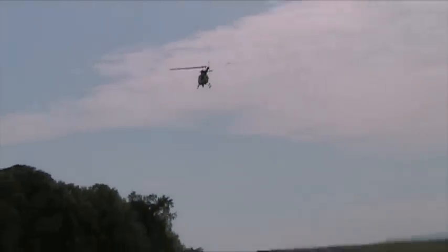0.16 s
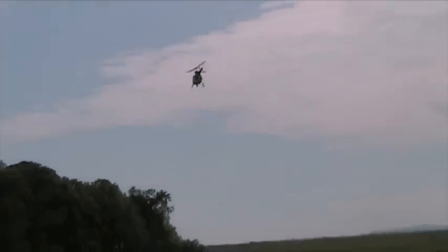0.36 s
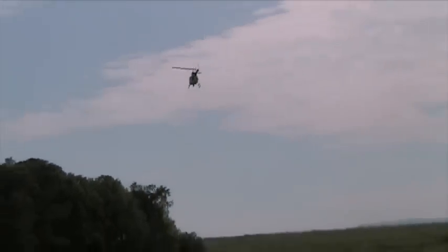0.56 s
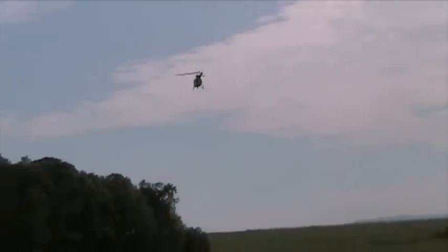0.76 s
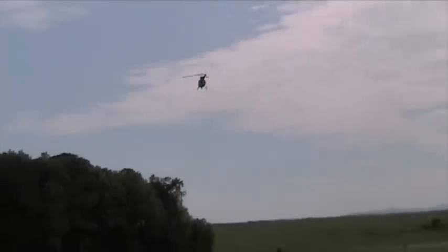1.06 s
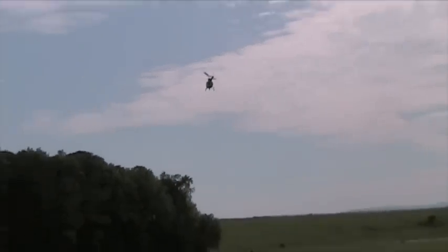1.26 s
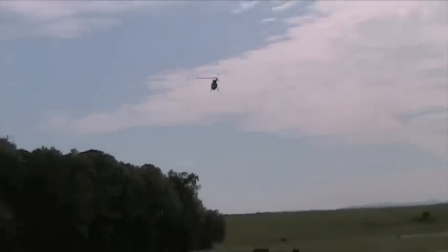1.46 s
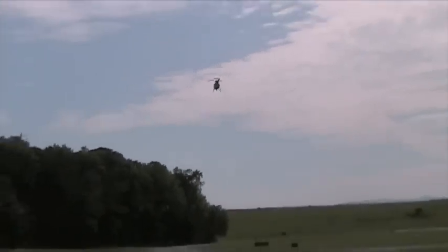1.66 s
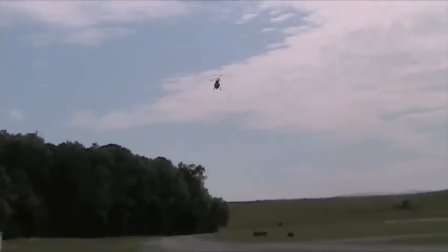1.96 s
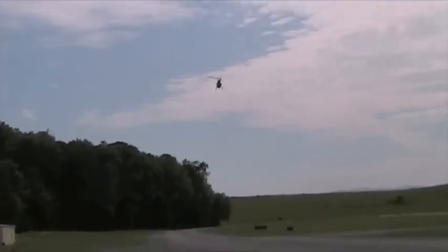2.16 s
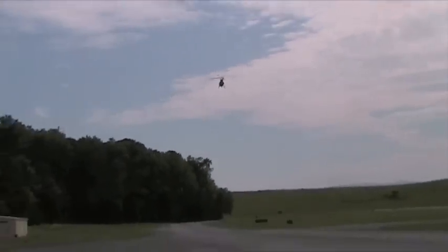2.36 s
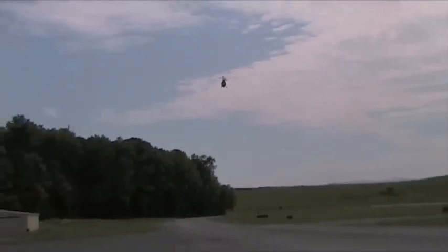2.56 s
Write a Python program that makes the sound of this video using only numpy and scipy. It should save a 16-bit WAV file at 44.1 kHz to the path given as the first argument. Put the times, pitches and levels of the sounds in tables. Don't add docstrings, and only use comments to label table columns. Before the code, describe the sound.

Helicopter receding outdoors: rapid throaty rotor throb dominates, with crackling blade slaps about twelve times a second, airy swishes and rough exhaust roar; the top softens with distance. Nearby handheld stereo microphone, slight hiss.

```python
import sys
import numpy as np
from scipy import signal
from scipy.fft import rfft, irfft, next_fast_len
from scipy.io import wavfile
from scipy.ndimage import uniform_filter1d, map_coordinates

SR = 44100
rng = np.random.default_rng(int(sys.argv[2]) if len(sys.argv) > 2 else 0)


def digitize_waveform(pressure):
    field = np.atleast_2d(pressure).T
    bounded = np.clip(field, -1, 1)
    quanta = np.round(bounded * 32767).astype(np.int16)
    wavfile.write(sys.argv[1], SR, quanta)


def linear_from_db(decibels):
    return 10 ** (np.asarray(decibels, float) / 20)


N = 120393

TAIL_HZ, TAIL_FIRST_S = 79.81, .0082
MAIN_HZ, WAKE_FIRST_S = 12.327, .062


def unit(x):
    return x / np.sqrt(np.mean(x ** 2) + 1e-20)


def along(points, hz):
    point_hz, value = np.transpose(points)
    return np.interp(np.log(hz + 1), np.log(point_hz + 1), value)


def colour(points):
    closed = [(points[0][0] / 2, -90), *points, (points[-1][0] * 2, -90)]
    return lambda hz: linear_from_db(along(closed, hz))


def wobble(rate_hz):
    knots = rng.standard_normal(int(N * rate_hz / SR) + 4)
    return map_coordinates(knots, [np.arange(N) * rate_hz / SR])


def filtered(x, response):
    m = next_fast_len(N + SR // 2)
    return irfft(rfft(x, m) * response(np.fft.rfftfreq(m, 1 / SR)), m)[..., :N]


def rush(spectrum, patchy_db):
    z = signal.stft(rng.standard_normal(N), nperseg=512)[2]
    patches = uniform_filter1d(rng.standard_normal(z.shape), size=5, axis=0)
    patches = unit(uniform_filter1d(patches, size=10, axis=1))
    noise = signal.istft(z * linear_from_db(patchy_db * patches), nperseg=512)[1][:N]
    return unit(filtered(noise, colour(spectrum)))


def spikes(s, size):
    at = np.clip(s * SR, 0, N - 1)
    i = at.astype(int)
    early = np.bincount(i, size * (1 - at + i), N + 1)
    late = np.bincount(i + 1, size * (at - i), N + 1)
    return (early + late)[:N]


def swell(s, rise_s, fall_s):
    return np.where(s < 0, np.exp(-(s / rise_s) ** 2), np.exp(-np.abs(s) / fall_s))


def ringing(x, peaks):
    def shape(f):
        total = sum(linear_from_db(db) * (1j * f * width / (hz * hz - f * f + 1j * f * width)) ** 2
                    for hz, width, db in peaks)
        return total / (1 + 1j * f / 1800) ** 2
    return filtered(x, shape) / np.abs(filtered(np.arange(N) == N // 2, shape)).max()


def from_wake(s):
    turn = np.round((s - WAKE_FIRST_S) * MAIN_HZ - .15)
    return s - WAKE_FIRST_S - turn / MAIN_HZ, turn.astype(int) + 1


def pass_db():
    # (time [s], extra level [dB])
    slaps = [(.22, 1.5), (.385, 2.5), (.71, 1.5), (1.2, 5.5), (1.44, 3), (1.6, 2.5), (1.77, 4.5),
             (1.86, 2.5), (1.93, 4), (2.09, 3.5), (2.25, 5), (2.42, 3.5), (2.58, 3.5)]
    scatter_db = 1.2
    s = WAKE_FIRST_S + (np.arange(int(N / SR * MAIN_HZ) + 3) - 1) / MAIN_HZ
    hard_db = sum(db * (np.abs(s - at) < .5 / MAIN_HZ) for at, db in slaps)
    return scatter_db * rng.standard_normal(len(s)) + hard_db


def tail_pulse(t, pass_s, jitter, strength):
    # (frequency [Hz], level [dB])
    pulse_spectrum = [(60, -27.5), (80, -13), (160, -2), (240, 1.5), (320, -2.5), (400, -2), (520, -12),
                      (800, -21.5)]
    # (frequency [Hz], level change [dB])
    flight_shift = [(80, -3), (160, -6), (240, 5.5), (320, 1), (400, 0), (480, -0.5), (640, -8.5)]
    lead_s, jitter_s, scatter_db, skew_rad, drift_db = .0004, .00008, .8, -.6, .8
    beats = spikes(pass_s - lead_s + jitter_s * jitter, -linear_from_db(scatter_db * strength))
    pulse = unit(filtered(beats, lambda hz: colour(pulse_spectrum)(hz) * np.exp(1j * skew_rad)))
    pulse = pulse * linear_from_db(drift_db * wobble(4.1))
    near = filtered(pulse, lambda hz: linear_from_db(-.5 * along(flight_shift, hz)))
    far = filtered(pulse, lambda hz: linear_from_db(.5 * along(flight_shift, hz)))
    share = (t / t[-1]) ** 2
    return (1 - share) * near + share * far


def wake_cracks(t, passes_db, pass_s, jitter, strength):
    # (time [s], peak level [dB])
    clear_cuts = [(0.041, -16), (0.056, -15), (0.116, -16), (0.13, -13), (0.203, -15), (0.219, -13),
                  (0.278, -19), (0.294, -13), (0.367, -15), (0.383, -12), (0.441, -18), (0.457, -12),
                  (0.531, -16), (0.545, -13), (0.604, -16), (0.62, -11), (0.689, -15), (0.708, -13),
                  (0.783, -16), (0.797, -16), (0.827, -18), (0.858, -17), (0.871, -16), (0.928, -19),
                  (0.946, -14), (1.021, -16), (1.035, -15), (1.109, -17), (1.179, -17), (1.198, -17),
                  (1.272, -16), (1.359, -19), (1.435, -16), (1.597, -18), (1.673, -18), (1.748, -18),
                  (1.761, -17), (1.836, -19), (1.925, -17), (1.975, -20), (1.998, -17), (2.087, -18),
                  (2.161, -19), (2.232, -19), (2.249, -14), (2.325, -19), (2.413, -17), (2.488, -17),
                  (2.577, -17), (2.651, -17)]
    # (frequency [Hz], width [Hz], level [dB])
    near_peaks = [(1230, 800, 0), (2600, 1200, -28)]
    # (frequency [Hz], width [Hz], level [dB])
    far_peaks = [(1100, 600, 0), (2800, 1200, -26)]
    peak_s, rise_s, fall_s = -.005, .012, .022
    lead_s, jitter_s, slide = .0013, .0002, .075
    scatter_db, fade_db_per_s, unlisted_db = 1.5, .3, -9
    stress, delay_s = 1.2, .0004

    gap_s, turn = from_wake(pass_s)
    size_db = scatter_db * strength + 0.11 * passes_db[turn] + fade_db_per_s * pass_s
    size = swell(gap_s - peak_s, rise_s, fall_s) * linear_from_db(size_db)
    faint = spikes(pass_s + jitter_s * jitter - lead_s + slide * gap_s, size)
    at, peak_db = np.transpose(clear_cuts)
    clear = spikes(at + delay_s, linear_from_db(stress * (peak_db - peak_db.max()) + fade_db_per_s * at))
    cuts = clear + linear_from_db(unlisted_db) * faint
    far = t / t[-1]
    return (1 - far) * ringing(cuts, near_peaks) + far * ringing(cuts, far_peaks)


def churned_air(t):
    # (frequency [Hz], density [dB per Hz])
    churn_spectrum = [(40, -36.5), (80, -27.5), (150, -8), (215, -5.5), (275, -3), (330, -17), (420, -21),
                      (550, -16), (900, -27.5)]
    beat = 1 + 0.053 * np.cos(2 * np.pi * TAIL_HZ * (t - TAIL_FIRST_S))
    return rush(churn_spectrum, patchy_db=0.0) * beat


def ground_bounce(x):
    delay_s, share, dull_hz = .0026, .6, 900

    def response(f):
        return 1 - share * np.exp(-2j * np.pi * f * delay_s) / np.sqrt(1 + (f / dull_hz) ** 4)
    return filtered(x, response)


def tail_rotor(t, passes_db):
    pulse_db, crack_db, churn_db = -3.3, 7.5, -0.7
    sag_hz_per_s = .022
    k = np.arange(int(N / SR * TAIL_HZ))
    pass_s = TAIL_FIRST_S + k / TAIL_HZ + sag_hz_per_s * k ** 2 / (2 * TAIL_HZ ** 3)
    jitter, pulse_strength, cut_strength = rng.standard_normal((3, len(k)))
    pulse = tail_pulse(t, pass_s, jitter, pulse_strength)
    crack = wake_cracks(t, passes_db, pass_s, jitter, cut_strength)
    return ground_bounce(linear_from_db(pulse_db) * pulse + linear_from_db(crack_db) * crack) + linear_from_db(churn_db) * churned_air(t)


def main_rotor(t, passes_db):
    # (frequency [Hz], level [dB])
    thump_spectrum = [(12, -40), (25, -18), (37, -11), (50, -3), (74, 0), (110, -9), (200, -40)]
    # (frequency [Hz], density [dB per Hz])
    swish_spectrum = [(800, -28.5), (1200, -5), (1700, -5), (2500, -4), (3600, -23.5), (4300, -21.5),
                      (6000, -38.5)]
    # (frequency [Hz], density [dB per Hz])
    tip_spectrum = [(3000, -18.5), (4200, -2.5), (5200, 1), (7000, -11), (10000, -26)]
    thump_db, swish_db, tip_db = -29.5, -23, -37.5
    thump_first_s, swish_lead_s, tip_late_s, tip_fade_db_per_s = .064, -.001, .007, -3

    s = np.arange(thump_first_s, N / SR, 1 / MAIN_HZ)
    thump = unit(filtered(spikes(s, -np.ones(len(s))), colour(thump_spectrum)))

    gap_s, turn = from_wake(t + swish_lead_s)
    swish = rush(swish_spectrum, patchy_db=1.8) * swell(gap_s, rise_s=.006, fall_s=.046)
    swish = swish * linear_from_db(passes_db[turn])

    gap_s, turn = from_wake(t - tip_late_s)
    tip = rush(tip_spectrum, patchy_db=5.0) * swell(gap_s, rise_s=.006, fall_s=.04)
    tip = tip * linear_from_db(.3 * passes_db[turn] + tip_fade_db_per_s * (t - t.mean()))
    return linear_from_db(thump_db) * thump + linear_from_db(swish_db) * swish + linear_from_db(tip_db) * tip


def engine(t):
    # (frequency [Hz], density [dB per Hz])
    roar_spectrum = [(430, -13.5), (600, -9.5), (820, -17), (1100, -10), (1900, -24.5), (3000, -31),
                     (5000, -39.5), (10000, -60)]
    roar_db, chop_depth, chop_late_s = -11, .13, .004
    whine_hz, whine_width_hz, whine_db = 4693, 8, -44.5
    whine_grows_db_per_s = 3
    chop = 1 + chop_depth * np.cos(2 * np.pi * MAIN_HZ * (t - WAKE_FIRST_S - chop_late_s))
    roar = linear_from_db(roar_db + 0.27 * wobble(9)) * chop * rush(roar_spectrum, patchy_db=0.95)
    whine = filtered(rng.standard_normal(N), lambda f: 1 / (1 + ((f - whine_hz) / whine_width_hz) ** 2))
    return roar + linear_from_db(whine_db + whine_grows_db_per_s * (t - t.mean())) * unit(whine)


def tip_snaps(t):
    # (time [s], peak level [dB])
    ticks = [(0.0877, -25), (0.2194, -28), (0.3835, -26), (0.5457, -26), (0.7083, -27), (1.1997, -24),
             (1.4381, -25), (1.6003, -29), (1.6944, -32), (1.7639, -26), (1.7774, -25), (1.8522, -31),
             (1.927, -28), (1.9544, -28), (2.0877, -31), (2.2508, -27), (2.4164, -30), (2.5775, -29)]
    # (frequency [Hz], density [dB per Hz])
    snap_spectrum = [(1900, -12), (2500, 0), (3600, -3), (4150, -7), (4600, -30)]
    snap_db = -9.5
    bursts = sum(linear_from_db(db) * swell(t - s - .002, rise_s=.001, fall_s=.004) for s, db in ticks)
    return linear_from_db(snap_db) * rush(snap_spectrum, patchy_db=1.5) * bursts


def fly_away(craft, t):
    # (time [s], level [dB])
    fade = [(0, -18), (0.399, -17.5), (1.4, -17), (2.1, -18), (2.73, -19.5)]
    dull_db_per_s, dull_above_hz = -1.8, 1500
    top = filtered(craft, lambda f: f ** 2 / (f ** 2 + dull_above_hz ** 2))
    dulled = craft + top * (linear_from_db(dull_db_per_s * (t - t.mean())) - 1)
    s, level_db = np.transpose(fade)
    return linear_from_db(np.interp(t, s, level_db)) * dulled


def microphone_pair(craft):
    # (frequency [Hz], left minus right [dB])
    lean = [(45, 6.6), (80, 4.8), (160, .6), (240, -.8), (400, -2.1), (800, -1), (2000, -.2), (9000, -.3)]
    # (frequency [Hz], left lag [rad])
    lag = [(45, 1), (80, .93), (160, .6), (260, .41), (400, .03), (950, -.2), (2800, 0)]
    # (frequency [Hz], level [dB])
    apart = [(40, -24.5), (150, -30), (500, -22.5), (1200, -13), (2500, -24), (5000, -7), (10000, 6.5)]
    hz, _, z = signal.stft(craft, SR, nperseg=256)
    turned = z * linear_from_db(along(apart, hz))[:, None] * np.exp(2j * np.pi * rng.random(z.shape))
    scatter = signal.istft(turned, SR, nperseg=256)[1][:N]
    half = np.array([[.5], [-.5]])
    pair = filtered(craft, lambda f: linear_from_db(half * along(lean, f)) * np.exp(-1j * half * along(lag, f)))
    return pair + 2 * half * scatter


def bird(t):
    # (time [s], length [s], frequency [Hz], rms level [dB])
    whistles = [
        (.57, .06, 3370, -47),
        (.66, .045, 3265, -48),
    ]
    total = 0
    for s, length_s, hz, db in whistles:
        envelope = np.sin(np.pi * np.clip((t - s) / length_s, 0, 1)) ** .5
        total = total + np.sqrt(2) * linear_from_db(db) * envelope * np.sin(2 * np.pi * hz * t)
    return total


def camera_motor(t):
    # (frequency [Hz], rms level [dB])
    tones = [(5094.8, -70), (5394.5, -72), (5994, -80), (6293.7, -76), (9290, -83), (10250, -86),
             (12000, -85), (12300, -85), (13250, -89), (13550, -88), (14550, -87), (15000, -89)]
    return np.sqrt(2) * sum(linear_from_db(db) * np.sin(2 * np.pi * hz * t) for hz, db in tones)


def capsule_hiss():
    # (frequency [Hz], density [dB per Hz])
    hiss_spectrum = [(100, -11.5), (1500, -20), (4000, -23.5), (7000, -29.5), (11000, -38.5), (16000, -45)]
    hiss_db = -55
    return linear_from_db(hiss_db) * np.array([rush(hiss_spectrum, patchy_db=0) for _ in range(2)])


def scene():
    t, passes_db = np.arange(N) / SR, pass_db()
    craft = tail_rotor(t, passes_db) + main_rotor(t, passes_db) + engine(t)
    return microphone_pair(fly_away(craft, t)) + tip_snaps(t) + bird(t)


def low_pass(x):
    return signal.sosfilt(signal.butter(12, 15150, fs=SR, output="sos"), x)


def record(dry):
    offset = [
        [.0073],
        [.0055],
    ]
    ceiling = .85
    limited = dry / (1 + np.abs(dry / ceiling) ** 6) ** (1 / 6)
    return low_pass(limited + capsule_hiss() + camera_motor(np.arange(N) / SR) + offset)


dry = scene()
out = record(dry)
digitize_waveform(out)
```